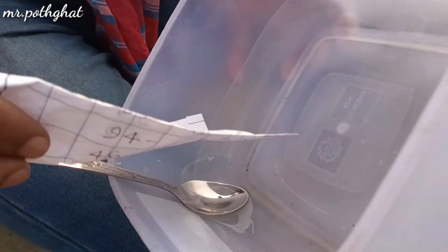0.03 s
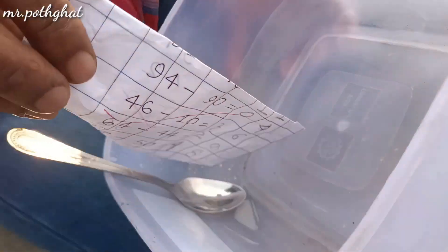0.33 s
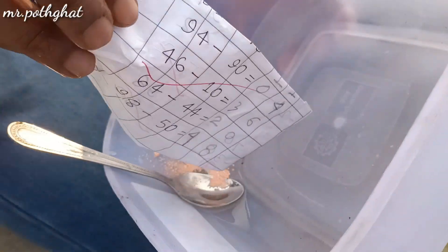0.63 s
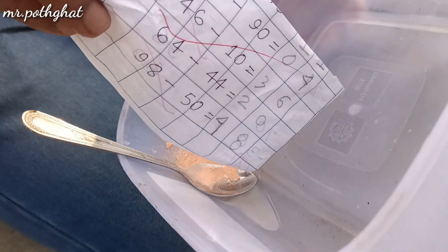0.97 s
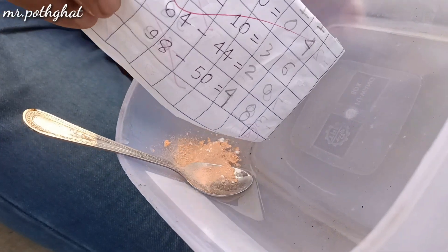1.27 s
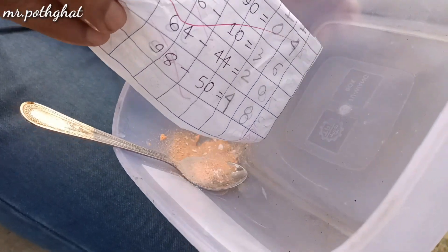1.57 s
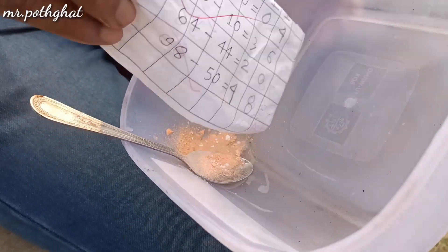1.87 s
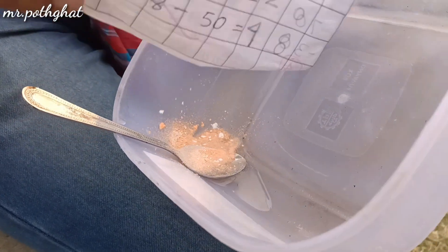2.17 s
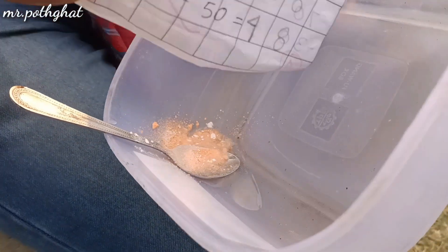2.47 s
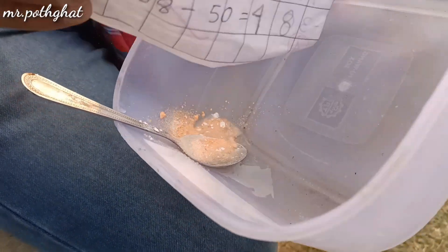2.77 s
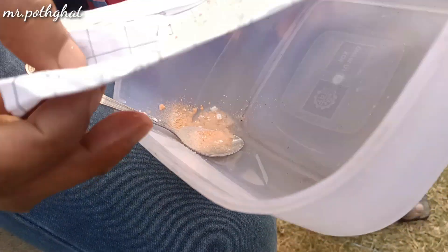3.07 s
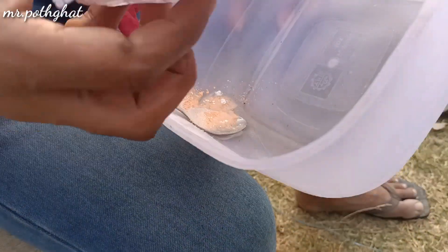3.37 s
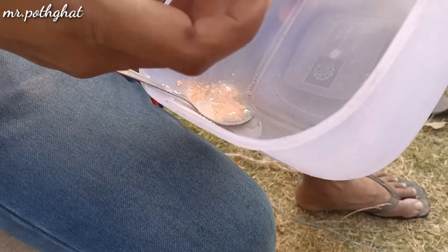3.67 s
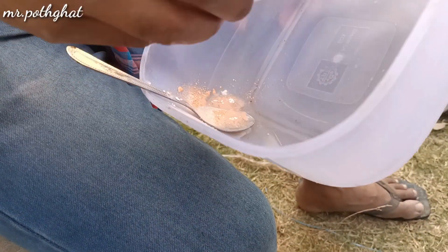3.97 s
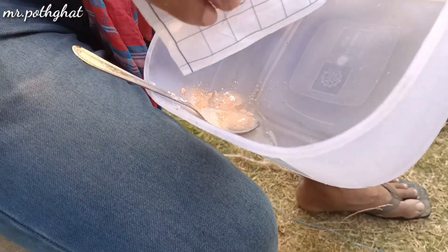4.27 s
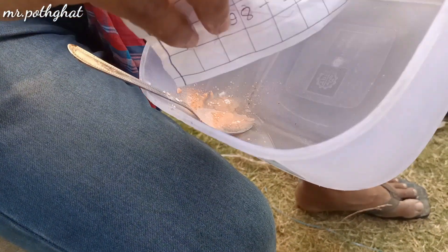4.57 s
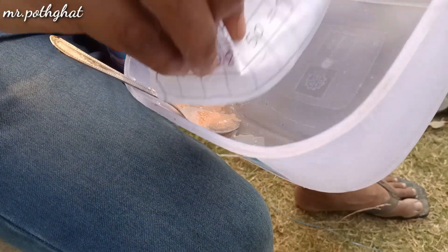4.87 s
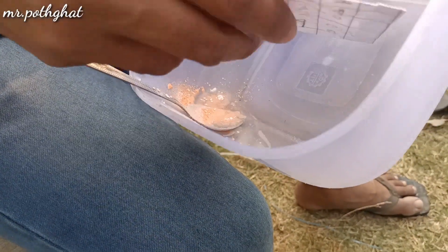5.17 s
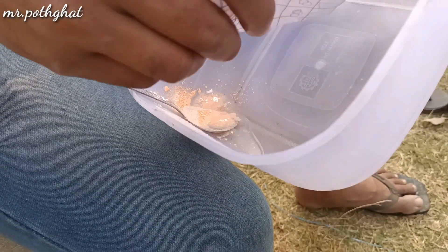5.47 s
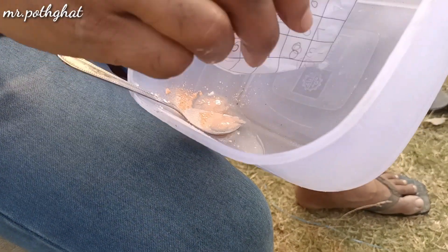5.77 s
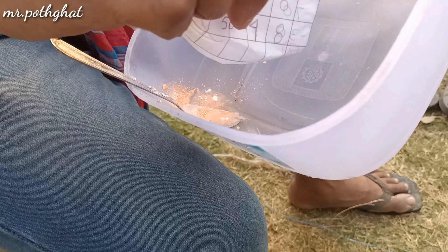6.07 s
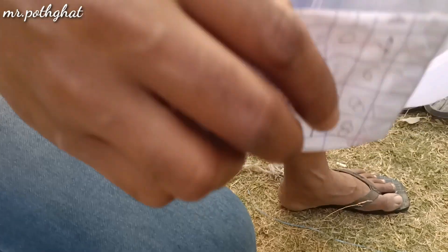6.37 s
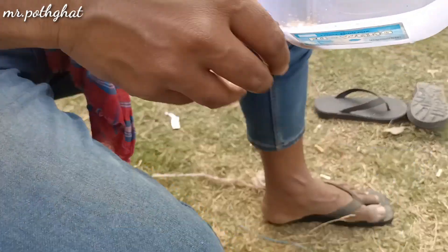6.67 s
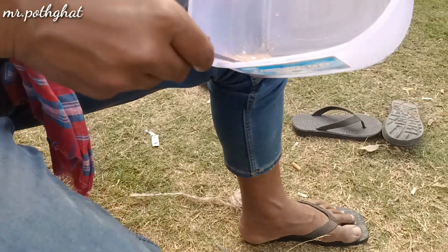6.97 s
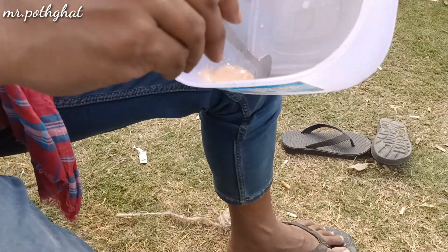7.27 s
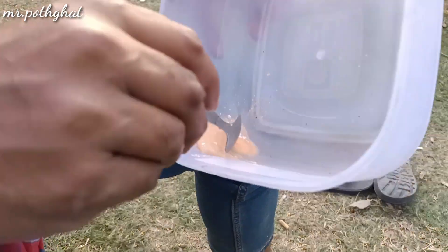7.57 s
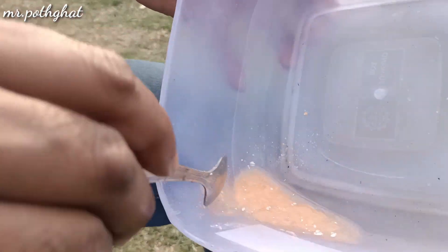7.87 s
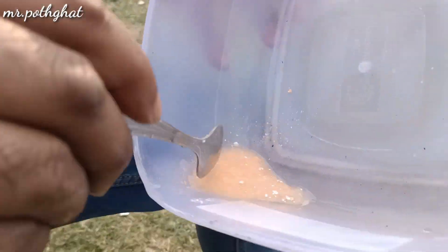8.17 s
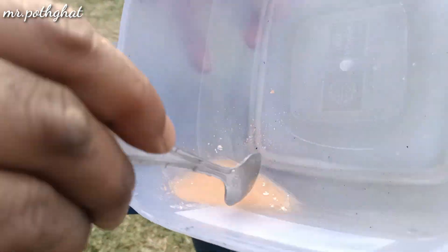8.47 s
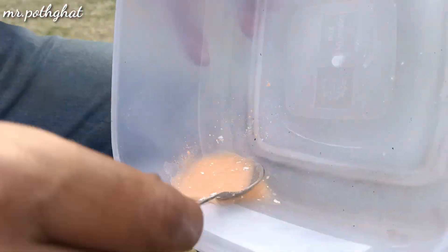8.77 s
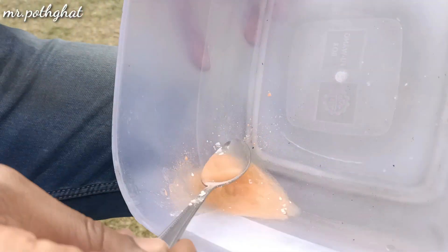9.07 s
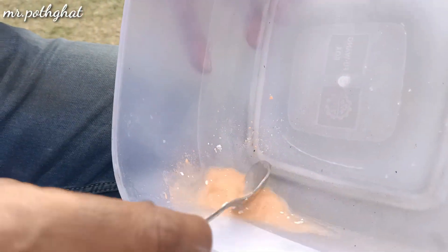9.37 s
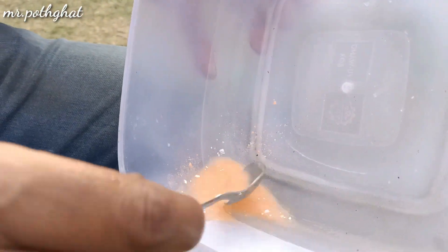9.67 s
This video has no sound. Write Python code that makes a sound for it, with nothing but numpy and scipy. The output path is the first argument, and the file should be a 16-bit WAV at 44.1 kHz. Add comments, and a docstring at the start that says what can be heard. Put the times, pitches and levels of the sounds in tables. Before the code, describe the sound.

The scene is outdoors, with close sounds over a quiet rumble and steady microphone hiss. In the first second, powder and fingertips swish softly on a sheet of paper. From 1.7 to 2.7 seconds a finger flicks the sheet five times, evenly, with dry snaps and skittering grains. Faint crinkles follow, then three louder flicks between 4.5 and 5 seconds. The paper rustles crisply near 5.8 seconds and more softly until 7. From about 7 seconds to the end, near 10, a steel teaspoon mixes wet powder in a thin plastic tub: irregular clicks and hollow, briefly ringing knocks, strongest around 8.3 and from 9.4 on, with short gritty scrapes until 9. Small birds whistle far off from about 1.8 seconds, and a nearer one gives thin falling chirps at 7.3, 8.9 and 9.8. A very faint distant hum sinks in pitch during the first four seconds.

```python
"""Outdoors, close up: a finger flicks a sheet of paper so that powder drops into a thin plastic tub.
Each flick snaps the sheet and sends powder skittering over it. The paper rustles as it is put away.
Then a steel teaspoon mixes the powder with a little water: its knocks make the tub ring briefly,
and grains catch under its edge as it scrapes. Small birds call from the trees over a quiet rumble,
a faint far-off hum and the hiss of the microphones."""
import sys
import numpy as np
from scipy import signal
from scipy.fft import rfft, irfft, next_fast_len
from scipy.io import wavfile
from scipy.ndimage import uniform_filter1d, map_coordinates

SR = 44100
rng = np.random.default_rng(int(sys.argv[2]) if len(sys.argv) > 2 else 0)


def file_out(sig):
    """Save sig as 16-bit WAV at sys.argv[1]."""
    # one column per channel
    cols = np.atleast_2d(sig).T
    # limit, then scale
    lim = np.clip(cols, -1, 1)
    pcm = np.round(lim * 32767).astype(np.int16)
    wavfile.write(sys.argv[1], SR, pcm)


N = 437031
TIME = np.arange(N) / SR  # seconds since the scene began
AGE = np.arange(SR // 4) / SR  # seconds since one short sound began

# A "colour" says how strong each frequency is. "Pan" is the left level minus the right level.
# colour of the far rumble and leaves: f/Hz, level/dB
AIR_COLOUR = [(12, -14), (20, -4.5), (76, -3), (156, -6.5), (211, -10.5), (412, -15), (544, -16.5),
              (655, -16.5), (864, -23), (1170, -26), (2230, -20.5), (2560, -19), (5000, -23.5), (6500, -30),
              (11000, -120)]
# how loud the rumble and leaves are over time: t/s, level/dB
AIR_LEVELS = [(0.0, -65.5), (0.66, -64.5), (1.41, -67.5), (1.82, -63.5), (4.16, -64.5), (9.9, -62)]
# how alike they sound at the two microphones: f/Hz, likeness/0-1
AIR_LIKENESS = [(60, 0.93), (290, 0.77), (640, 0.49), (1400, 0)]
# colour of the microphones' hiss: f/Hz, level/dB
HISS_COLOUR = [(3000, -45.5), (5500, -17), (7000, -9.5), (8600, 0), (9400, -4.5), (9900, -24), (11500, -13),
               (15000, -22.5), (16000, -20.5)]
# a faint far-off hum, perhaps traffic: t/s, f/Hz, level/dB
HUM_PATH = [(.3, 750, -96), (.7, 740, -74.5), (1.2, 720, -84), (2.2, 699.5, -70), (3.399, 660, -77),
            (4.2, 650, -90)]
# whistles of far birds: t/s, length/s, start f/Hz, end f/Hz, level/dB, roughness (0 is smooth)
BIRD_WHISTLES = [(1.771, 0.16, 4500, 2414, -64.5, .7), (1.773, 0.089, 4200, 4200, -59, 0.33),
                 (2.517, 0.12, 5160, 5250, -71.5, 0.65), (2.855, 0.094, 2700, 3150, -68.5, 0.98),
                 (2.944, .16, 4480, 3930, -66.5, 0.64), (3.179, .11, 2440, 2330, -68.5, .3),
                 (3.51, 0.13, 4180, 4200, -67, 0.46), (3.576, 0.13, 3395, 2880, -65, 1.12),
                 (3.814, 0.064, 4040, 4090, -66, 0.18), (3.866, 0.067, 3850, 3030, -76, 0.4),
                 (4.138, 0.11, 2780, 3260, -73.5, 0.66), (6.348, .15, 4000, 2240, -65, 0.61),
                 (7.666, 0.085, 4090, 4300, -68, 0.36), (8.216, 0.15, 4030, 3840, -71.5, 0.1),
                 (8.963, .21, 4320, 4470, -58.5, 0.05), (9.212, 0.13, 5370, 5150, -59.5, 0.24),
                 (9.48, 0.08, 4960, 4180, -60.5, 0.07), (9.557, 0.062, 3710, 4120, -61.5, 0.3),
                 (9.753, 0.057, 3010, 2810, -62, 0.15)]
# spells of faint bird chatter: start t/s, end t/s
CHATTER_SPELLS = [(2.6, 4.3), (7.6, 8.7)]
# thin falling chirps of a nearer bird: t/s, start f/Hz, level/dB
BIRD_CHIRPS = [(7.255, 7460, -48), (8.94, 6980, -36), (9.759, 7050, -32)]
# echo of the trees: f/Hz, time to fade by 60 dB/s
TREE_ECHO = [(2000, 0.61), (8000, 0.51)]
# powder and fingertips hissing on the sheet: peak t/s, rise/s, fall/s, level/dB, pan/dB
PAPER_SWISHES = [(.26, 0.077, 0.019, -58.5, -8), (.345, 0.087, 0.063, -59.5, -9),
                 (0.419, 0.057, 0.033, -57, -9), (.52, 0.22, 0.33, -58, -11),
                 (0.831, 0.091, 0.16, -53.5, -9), (3.6, .55, 0.61, -61.5, 4)]
# paper sliding under the fingers: peak t/s, rise/s, fall/s, level/dB
PAPER_SLIDES = [(.55, 0.23, 0.16, -58.5), (0.799, 0.05, 0.036, -46.5), (0.854, .04, 0.075, -48.5),
                (3.66, 0.84, 0.22, -64), (5.62, 0.13, 0.078, -52.5), (5.738, 0.061, 0.038, -32),
                (5.819, 0.049, 0.033, -29.5), (6.65, 0.31, 0.2, -55), (6.942, 0.0046, 0.019, -42),
                (7.028, .13, 0.074, -46.5)]
# colour of rustling paper: f/Hz, level/dB
RUSTLE_COLOUR = [(240, -50), (400, -23.5), (579, -13), (814, -32.5), (1130, -17), (1840, -21.5),
                 (2290, -8.5), (2970, -12), (3580, -15), (5430, -8.5), (14600, -28), (16000, -47)]
# finger flicks: t/s, thump/dB, crack/dB, skittering powder/dB, first touch against the blow/dB,
# wait until the sheet springs back/s, pan/dB
FINGER_FLICKS = [(1.685, -47.5, -34, -74, -5, 0.028, 1.5), (1.939, -47.5, -36, -50, -6.5, 0.041, 0),
                 (2.183, -47, -42, -47.5, -1.5, 0.032, -6), (2.42, -42.5, -34, -45.5, -5, .042, -0.5),
                 (2.693, -45.5, -40.5, -40, -8.5, .055, -4.5), (4.504, -34, -27.5, -37, -8, 0.055, -1.5),
                 (4.748, -32, -29.5, -47.5, -35, 0.021, -3), (4.978, -28.5, -34, -36, -35, 0.035, -3.5)]
# single crinkles of the sheet: t/s, level/dB, brightness/dB, pan/dB
PAPER_CRINKLES = [(0.778, -63.5, 22.5, -8), (.809, -55, 11, -6), (.848, -64, 19, -8), (0.991, -62.5, 9, -8),
                  (1.444, -42, -11, -6), (1.579, -58, -4, -5), (1.614, -52.5, 2, -7.5),
                  (2.031, -61.5, -25.5, 4), (3.39, -57, 0, 8), (3.493, -46, -14, -2.5),
                  (3.6419, -64, 29, 11), (4.092, -59, 8, -6), (4.103, -52.5, -11, -1), (4.485, -51, 7, -1),
                  (4.585, -48, -5, 1), (5.542, -55.5, -5, 0.5), (6.18, -50, -13, 6),
                  (6.235, -39.5, -5.5, -3.5)]
# colour of snapping paper: f/Hz, level/dB
SNAP_COLOUR = [(35, -47), (60, -6.5), (262, -8.5), (579, 2.5), (749, 1), (1200, -4), (1410, -15.5),
               (2470, -7), (3580, -15.5), (3940, -11), (5330, -10.5), (9790, -13), (11300, -4),
               (14900, -26), (16000, -13.5)]
# tones of the tub with the spoon in it: f/Hz, level/dB, time to fade by 60 dB/s, pan/dB
TUB_TONES = [(141, 2.5, 0.054, -2.5), (201.6, 8, 0.13, -9), (318.6, -18, 0.012, -30),
             (426, -11.5, 0.034, 2), (620.4, 2.5, 0.057, -5), (750, -1, 0.037, -7), (925, 1, 0.029, -3.5),
             (1300, -9.5, 0.043, 8.5), (1830, 4, 0.093, 8), (2067, -7, 0.044, 30), (2310, 14, 0.058, 5.5),
             (3170, 8, 0.06, 1), (3606, -11.5, 0.032, 1), (4030, 13, 0.01, -6), (4590, -17, 0.09, 28.5),
             (5200, -2, .02, -1.5)]
# the spoon dragged through wet powder: peak t/s, rise/s, fall/s, grit/dB, hum of the wall/dB
SPOON_SCRAPES = [(7.286, 0.11, 0.032, -44.5, -47), (7.447, 0.032, 0.023, -47.5, -61),
                 (7.55, 0.12, 0.058, -46.5, -55), (7.643, 0.091, 0.055, -44.5, -46),
                 (8.089, 0.12, 0.061, -35.5, -45), (8.171, 0.018, 0.041, -53.5, -58),
                 (8.414, 0.063, 0.069, -31.5, -45), (8.56, 0.094, 0.21, -56, -76),
                 (8.835, 0.07, 0.11, -38, -52), (8.908, 0.1, 0.11, -46, -46.5)]
# colour of the scraping grains: f/Hz, level/dB
GRIT_COLOUR = [(180, -70), (300, -20), (787, -12), (1340, -9), (1720, -23), (2100, 0), (2360, -12),
               (2980, -6), (4440, -10), (5520, -7.5), (6300, -12.5), (7320, -13.5), (9710, -23.5),
               (14700, -36.5), (16000, -42.5)]
# spoon blows on the tub: t/s, flexing/dB, wall/dB, click/dB, sharp tick/dB, wall f/Hz
SPOON_KNOCKS = [(6.786, -67, -85, -52.5, -76, 625), (6.895, -62, -58, -81, -86, 600),
                (7.096, -44, -38, -66, -77, 646), (7.41, -39.5, -42, -46, -85, 640),
                (7.455, -45, -35, -41, -77, 580), (7.643, -63, -52, -46, -85, 620),
                (7.886, -82, -65.5, -60.5, -61, 614), (7.979, -31.5, -23.5, -40, -59.5, 616),
                (8.045, -38, -41, -60, -71, 603), (8.3438, -27, -18, -30.5, -73, 630),
                (8.718, -29.5, -27.5, -34, -73, 608), (8.825, -35, -34.5, -46, -53.5, 654),
                (8.907, -43, -37.5, -41.5, -64, 504), (9.3723, -61, -55, -38.5, -40.5, 610),
                (9.377, -42.5, -16, -24, -39.5, 612), (9.511, -38, -32.5, -51, -50, 662),
                (9.5265, -65, -22, -34.5, -53, 640), (9.7084, -29, -24.5, -25.5, -45.5, 618),
                (9.8847, -34, -21, -25, -62, 629), (9.8969, -32.5, -34, -36, -54, 555)]
# colour of the spoon's click: f/Hz, level/dB
CLICK_COLOUR = [(300, 1.5), (1000, -12), (3500, 5.5), (5500, 1), (8000, -11.5), (11000, -40), (15000, -58)]
# colour of bare steel ticking on bare plastic: f/Hz, level/dB
TICK_COLOUR = [(4000, -27), (9000, 10), (11500, 4.5), (15000, -9)]
# how the two microphones hear close sounds: f/Hz, left level/dB, right level/dB
MIC_COLOURS = [(4670, 2.5, 0.5), (5600, -6.5, 1.5), (6500, -31.5, -1), (8400, -6, 0), (9100, -6.5, -5.5),
               (13570, 9, 8), (14930, -2.5, 12)]

WALL_HZ = 623  # the pitch of the tub's wall for which TUB_TONES is listed


def amp(db):
    """Turn decibels into a number to multiply by."""
    return 10 ** (np.asarray(db) / 20)


def unit(x):
    """Scale x to an average strength (rms) of 1."""
    return x / np.sqrt(np.mean(x ** 2) + 1e-20)


def burst(x):
    """Give x the energy of 20 ms of sound at strength 1."""
    return unit(x) * np.sqrt(SR / 50 / x.shape[-1])


def along(points, hz):
    """Read between (f/Hz, value) points, on a log frequency scale."""
    f, values = np.transpose(points)
    return np.interp(np.log(hz + 1), np.log(f + 1), values)


def filtered(x, response):
    """Multiply each frequency in x by response(hz)."""
    length = x.shape[-1]
    padded = next_fast_len(length + 4096)
    return irfft(rfft(x, padded) * response(np.fft.rfftfreq(padded, 1 / SR)), padded)[..., :length]


def coloured(x, colour, size=4096):
    """Give x a colour, with a filter that rings only after a sound, never before it."""
    cepstrum = irfft(np.log(amp(along(colour, np.fft.rfftfreq(size, 1 / SR)))))
    cepstrum[1:size // 2] *= 2
    cepstrum[size // 2 + 1:] = 0
    impulse = irfft(np.exp(rfft(cepstrum)))
    return signal.fftconvolve(x, impulse[None], axes=1)[:, :x.shape[-1]]


def stereo_noise(length, apart):
    """Left and right noise: the same when apart is 0, unrelated when it is 1."""
    mid, side = rng.standard_normal((2, length))
    return unit(np.array([mid + apart * side, mid - apart * side]))


def wobble(rate):
    """A smooth curve through rate random points a second."""
    return map_coordinates(rng.standard_normal(int(N * rate / SR) + 4), [TIME * rate])


def fade(seconds):
    """Die away by 60 dB in the given time."""
    return np.exp(-np.log(1000) * AGE / seconds)


def panned(db):
    """Left and right gains that make the left side louder by db."""
    return amp([[db / 2], [-db / 2]])


def add(track, t, sound):
    """Mix a sound into the track at t seconds."""
    start = round(t * SR)
    track[:, start:start + sound.shape[-1]] += sound[..., :max(N - start, 0)]


def background(hiss_db=-67):
    """Far rumble and leaves, alike at both microphones only in the bass, under steady hiss."""
    def mid_and_side(hz):
        spread = np.arccos(np.clip(along(AIR_LIKENESS, hz), -1, 1)) / 2
        return amp(along(AIR_COLOUR, hz)) * [np.cos(spread), np.sin(spread)]
    mid, side = filtered(rng.standard_normal((2, N)), mid_and_side)
    air_db = np.interp(TIME, *np.transpose(AIR_LEVELS)) + 1.8 * wobble(4.9)
    air = unit(np.array([mid + side, mid - side]))
    hiss = unit(coloured(rng.standard_normal((2, N)), HISS_COLOUR))
    return amp(air_db) * air + amp(hiss_db) * hiss


def far_hum(width_hz=30):
    """A narrow, wavering band of noise that slowly sinks in pitch."""
    t, hz, db = np.transpose(HUM_PATH)
    waver = filtered(rng.standard_normal((2, N)), lambda f: np.exp(-(f / width_hz) ** 2))
    tone = np.sin(2 * np.pi * np.cumsum(np.interp(TIME, t, hz)) / SR)
    return amp(np.interp(TIME, t, db) + 2.5 * wobble(15)) * unit(waver * tone)


def whistle(length, start_hz, end_hz, rough):
    """One gliding bird note; a rough one flutters in pitch and loudness."""
    progress = np.linspace(0, 1, int(length * SR))
    points = rng.standard_normal((2, 128))
    flutter, tremble = (map_coordinates(row, [progress * length * 350]) for row in points)
    hz = start_hz * (end_hz / start_hz) ** progress + 130 * rough * flutter
    loudness = np.sin(np.pi * progress) * amp(4 * rough * tremble)
    return unit(loudness * np.sin(2 * np.pi * np.cumsum(hz) / SR))


def chirp(start_hz, length=0.075, sag_hz=1660, warble_hz=42.7, depth_hz=402, overtone_db=-30):
    """One thin bird note with a weak overtone; it warbles, peaks early and sags in pitch as it fades."""
    t = AGE[:int(length * SR)]
    progress = t / length
    warble = depth_hz * (1 - progress) * np.sin(2 * np.pi * warble_hz * t)
    hz = start_hz - sag_hz * progress ** 3 + warble
    phase = 2 * np.pi * np.cumsum(hz) / SR
    loudness = np.sin(np.pi * progress ** 0.63) ** 2
    return loudness * (np.sin(phase) + amp(overtone_db) * np.sin(2 * phase))


def tree_echo(song, echo_db=-1):
    """The trees smear each note into a fading tail; lower notes come from farther off and echo more."""
    hz, t, noise = signal.stft(rng.standard_normal((2, SR // 2)), SR, nperseg=256)
    strength = amp(along([(3000, 7.5), (7000, -5.5)], hz))[:, None]
    decay = np.exp(-np.log(1000) * t / along(TREE_ECHO, hz)[:, None])
    tail = signal.istft(noise * strength * decay, SR, nperseg=256)[1]
    return amp(echo_db) * signal.fftconvolve(song, tail / np.linalg.norm(tail[0]), axes=1)[:, :N]


def birds(notes_per_spell=7, chatter_db=-74.5):
    """Small birds whistle, chatter faintly and chirp among the echoing trees."""
    song = np.zeros((1, N))
    for t, length, start_hz, end_hz, db, rough in BIRD_WHISTLES:
        add(song, t, amp(db) * whistle(length, start_hz, end_hz, rough))
    for start, end in CHATTER_SPELLS:
        for when, pitch, glide in rng.random((notes_per_spell, 3)):
            middle_hz = 2200 * 2 ** pitch
            step_hz = 900 * (glide - 0.5)
            note = whistle(0.11, middle_hz + step_hz, middle_hz - step_hz, rough=0.8)
            add(song, start + when * (end - start), amp(chatter_db) * note)
    for t, start_hz, db in BIRD_CHIRPS:
        add(song, t, amp(db) * chirp(start_hz))
    return song + tree_echo(song)


def stroke(t, rise, fall, db, swell_db=25):
    """Loudness of one stroke of the hand: it swells to its peak at t and dies away."""
    away = np.maximum((t - TIME) / rise, (TIME - t) / fall)
    return amp(db - swell_db * np.minimum(away, 10))


def friction(colour, rate, spread_db, apart):
    """Rubbing makes tiny uneven slips, rate a second; their tone shifts as the contact moves."""
    slips = stereo_noise(N, apart) * amp(spread_db * wobble(rate))
    spectrum = signal.stft(slips, nperseg=256)[2]
    # random loud and soft patches, smoothed over frequency and then over time
    patches = uniform_filter1d(rng.standard_normal(spectrum.shape[1:]), size=2, axis=0)
    patches = uniform_filter1d(patches, size=18, axis=1)
    slips = signal.istft(spectrum * amp(4.8 * unit(patches)), nperseg=256)[1][:, :N]
    return unit(coloured(slips, colour))


def paper_swish():
    """Light, dry contact with the sheet gives a broad hiss, only a little stronger in the treble."""
    gain = sum(stroke(*row) * panned(pan_db) for *row, pan_db in PAPER_SWISHES)
    colour = [(2000, -8), (9000, -3.5), (11500, -7), (15000, -20)]  # f/Hz, level/dB
    return gain * friction(colour, rate=1200, spread_db=4, apart=1)


def paper_rustle(rise_s=0.0037):
    """The sheet slides between the fingers, and powder skitters over it after each flick."""
    skitter = np.zeros((1, N))
    for t, _, _, powder_db, *_ in FINGER_FLICKS:
        add(skitter, t, amp(powder_db) * (1 - np.exp(-AGE / rise_s)) * fade(0.24))
    slides = sum(stroke(*row) for row in PAPER_SLIDES)
    return (slides + skitter) * friction(RUSTLE_COLOUR, rate=1000, spread_db=3.5, apart=0.7)


def snap_events(touch_s=0.0055, spring_db=-16.5, spring_bright_db=-2.5):
    """List the sheet's snaps as t/s, thump/dB, crack/dB, tick/dB, pan/dB; a crinkle is one snap."""
    snaps = []
    for t, thump_db, crack_db, _, touch_db, spring_s, pan_db in FINGER_FLICKS:
        tick_db = crack_db - 14 + 0.48 * (thump_db - crack_db)  # a heavier thump adds treble
        # a flick is three: the nail touches, the blow lands, the sheet springs back softer and duller
        stages = [(-touch_s, touch_db, 0), (0, 0, 0), (spring_s, spring_db, spring_bright_db)]
        for delay, db, bright_db in stages:
            snaps.append((t + delay, thump_db + db, crack_db + db, tick_db + db + bright_db, pan_db))
    for t, db, bright_db, pan_db in PAPER_CRINKLES:
        snaps.append((t, db - 22 - bright_db, db, db - 11 + bright_db, pan_db))
    return snaps


def paper_snaps(rise_s=0.00064, brush_s=0.0045, brush_db=-20, sheet_db=-8, sheet_hz=2380):
    """The finger brushes the sheet and snaps against it; the tight sheet rings briefly and flutters."""
    out = np.zeros((2, N))
    lead_in = AGE[:SR // 60]
    brush = amp(brush_db) * np.exp(-lead_in[::-1] / brush_s)
    blow = (1 - np.exp(-AGE / rise_s)) * fade(0.024) + amp(-26) * fade(0.17)
    loudness = np.concatenate([brush, blow])
    bands = [signal.butter(3, hz, kind, fs=SR, output="sos")
             for hz, kind in [(1400, "low"), ((1400, 7000), "band"), (7000, "high")]]
    for t, thump_db, crack_db, tick_db, pan_db in snap_events():
        snap = coloured(stereo_noise(len(loudness), apart=0.57) * loudness, SNAP_COLOUR)
        thump, crack, tick = (burst(signal.sosfilt(band, snap)) for band in bands)
        hz = sheet_hz * np.exp(0.1 * rng.standard_normal())  # pitch depends on how the sheet is bent
        sheet = burst(signal.lfilter(*signal.iirpeak(hz, Q=15, fs=SR), snap))
        crack = burst(crack + amp(sheet_db) * sheet)
        sound = amp(thump_db) * thump + amp(crack_db) * crack + amp(tick_db) * tick
        add(out, t - lead_in[-1], sound * panned(pan_db))
    return out


def tub_ring(low_hz, high_hz, pitch=1, ring_limit_s=0.066):
    """The tub's tones in one range; level, pitch and fade vary with the spot struck and the grip."""
    out = np.zeros((2, len(AGE)))
    grip = np.exp(0.12 * rng.standard_normal())
    for k, (hz, db, fade_s, pan_db) in enumerate(TUB_TONES):
        extra_db, detune = rng.standard_normal(2) * ([2, 0.012] if hz < 1550 else [3.5, 0.02])
        # the hand and the soft plastic cut every ring short, the high ones most
        ring_s = grip * min(fade_s, ring_limit_s * np.sqrt(WALL_HZ / hz))
        if low_hz <= hz < high_hz:
            tone = (-1) ** k * np.sin(2 * np.pi * hz * pitch * (1 + detune) * AGE)
            out += panned(pan_db) * amp(db + extra_db) * fade(ring_s) * tone
    # so small a tub gives off almost no deep bass
    return burst(signal.sosfilt(signal.butter(3, 125, "high", fs=SR, output="sos"), out))


def spoon_scrapes():
    """Fine grains catch under the spoon's edge and keep the tub's wall humming."""
    grit = friction(GRIT_COLOUR, rate=750, spread_db=4.6, apart=0.6)
    wall = unit(signal.fftconvolve(grit, tub_ring(400, 1550), axes=1)[:, :N])
    grit_gain = sum(stroke(t, rise, fall, db) for t, rise, fall, db, _ in SPOON_SCRAPES)
    wall_gain = sum(stroke(t, rise, fall, db) for t, rise, fall, _, db in SPOON_SCRAPES)
    return (grit_gain * grit + wall_gain * wall) * panned(-1)


def spoon_knocks():
    """The spoon flexes the tub, rings its wall and clicks; bare steel on plastic adds a sharp tick."""
    out = np.zeros((2, N))
    impact = (1 - np.exp(-AGE / 0.0003)) * (fade(0.013) + amp(-28) * fade(0.08))
    for t, flex_db, wall_db, click_db, tick_db, wall_hz in SPOON_KNOCKS:
        flex = tub_ring(0, 400)
        wall = tub_ring(400, 1550, pitch=wall_hz / WALL_HZ)
        high_ring = tub_ring(1550, SR)
        contact = stereo_noise(len(AGE), apart=0.76) * impact
        click = burst(high_ring + amp(2.5) * panned(-1) * burst(coloured(contact, CLICK_COLOUR)))
        tick = burst(coloured(contact, TICK_COLOUR))
        knock = amp(flex_db) * flex + amp(wall_db) * wall + amp(click_db) * click + amp(tick_db) * tick
        add(out, t, knock)
    return out


def close_microphones(sound, lag_s=0.000311):
    """Tub and paper are nearer the right microphone, so the left one hears them a little later; each microphone
    also colours close sounds its own way, the left with a deep dip near 6.5 kHz and less top treble."""
    def response(f):
        colour = amp([along(np.c_[hz, db], f) for db in (left_db, right_db)])
        delay = np.exp(1j * np.pi * f * lag_s * np.array([[-1], [1]]))
        return colour * delay
    hz, left_db, right_db = np.transpose(MIC_COLOURS)
    return filtered(sound, response)


def scene():
    """The spoon and the paper close by, with the birds and the outdoors behind them."""
    near = spoon_knocks() + spoon_scrapes() + paper_snaps() + paper_rustle() + paper_swish()
    return close_microphones(near) + birds() + far_hum() + background()


def record(dry, top_hz=15700):
    """Cut away the very highest treble."""
    return filtered(dry, lambda hz: 1 / np.sqrt(1 + (hz / top_hz) ** 160))


dry = scene()
out = record(dry)
file_out(out)
```